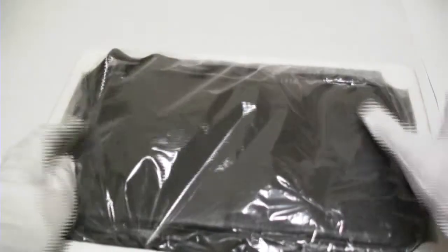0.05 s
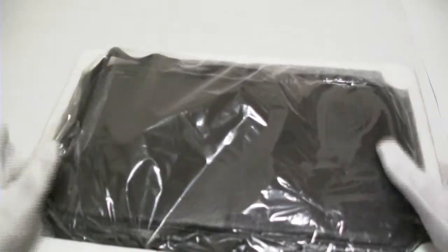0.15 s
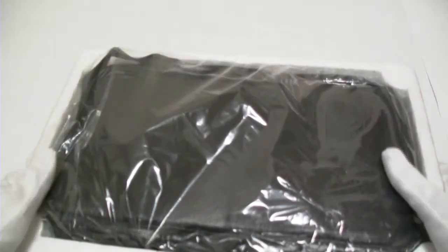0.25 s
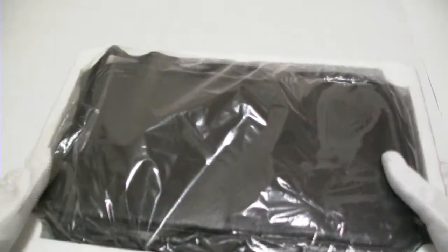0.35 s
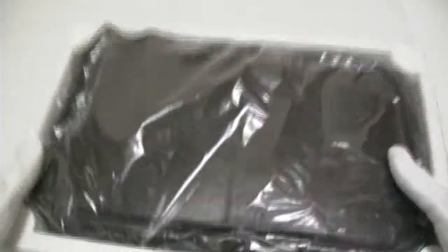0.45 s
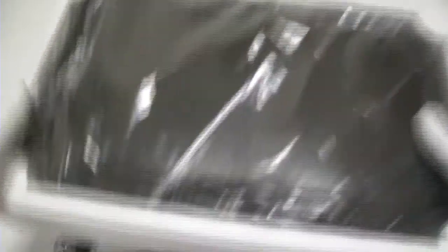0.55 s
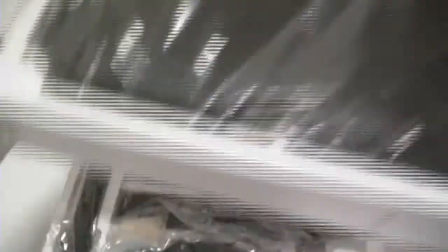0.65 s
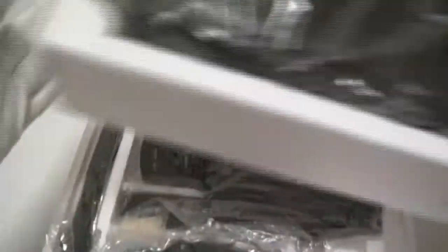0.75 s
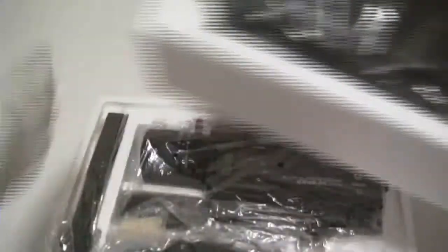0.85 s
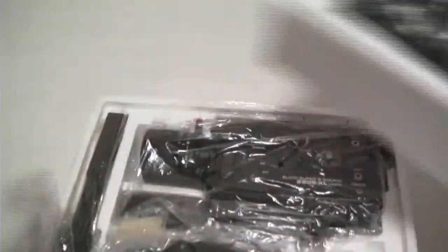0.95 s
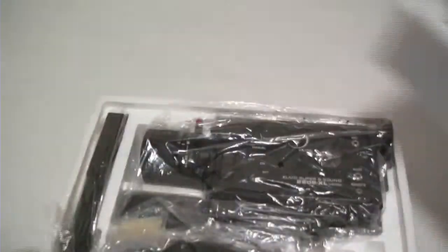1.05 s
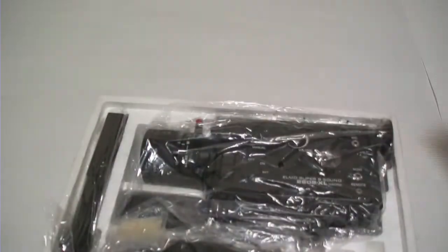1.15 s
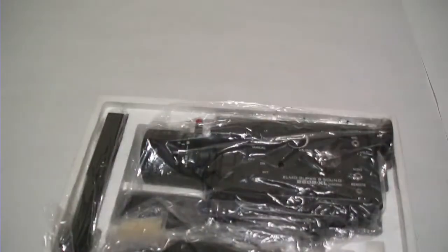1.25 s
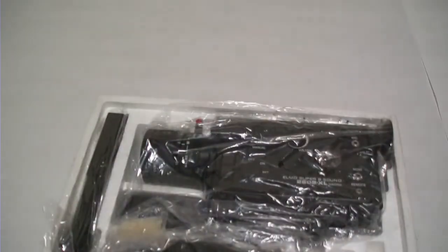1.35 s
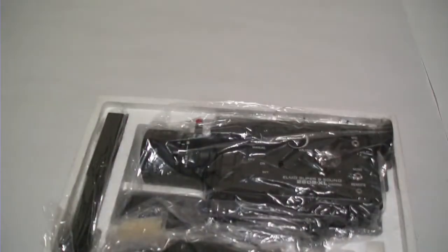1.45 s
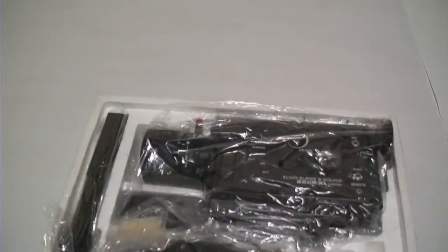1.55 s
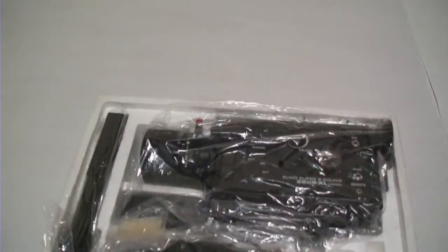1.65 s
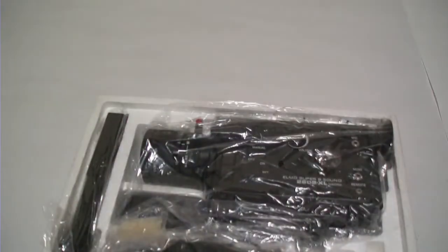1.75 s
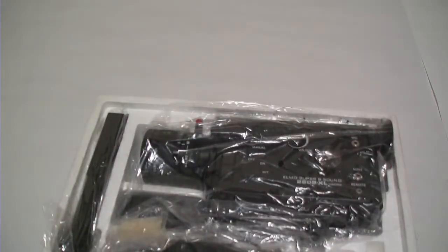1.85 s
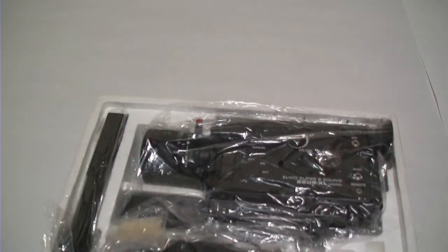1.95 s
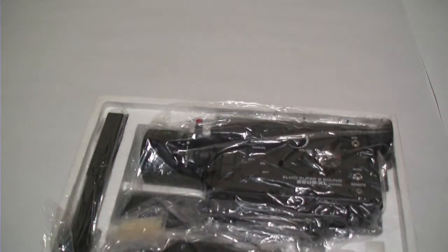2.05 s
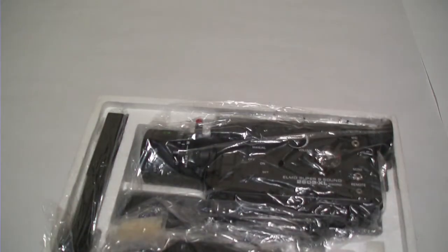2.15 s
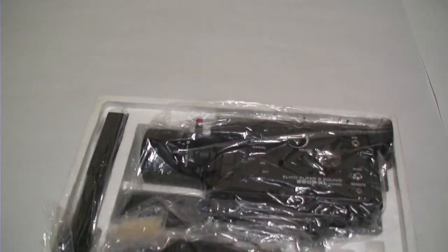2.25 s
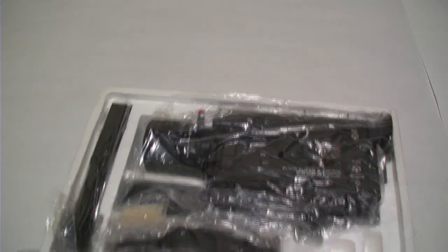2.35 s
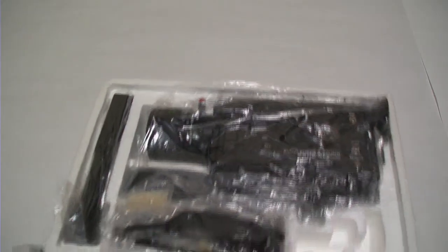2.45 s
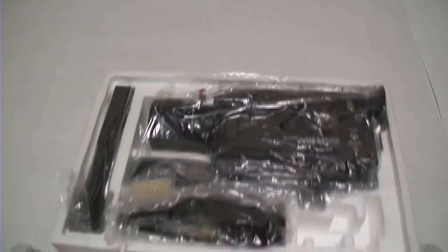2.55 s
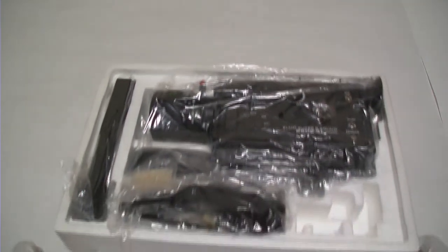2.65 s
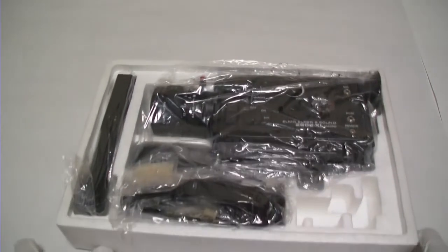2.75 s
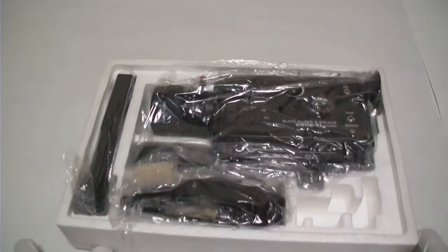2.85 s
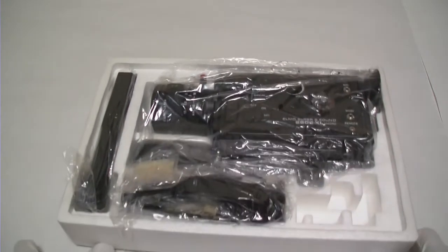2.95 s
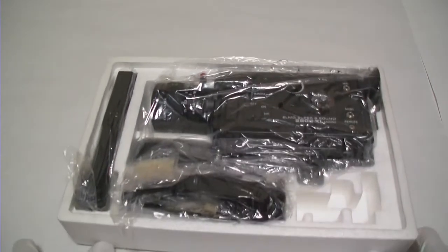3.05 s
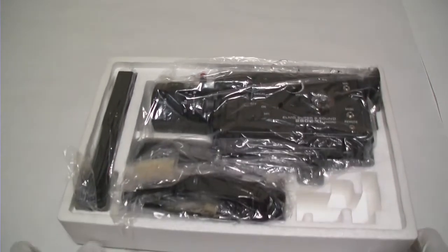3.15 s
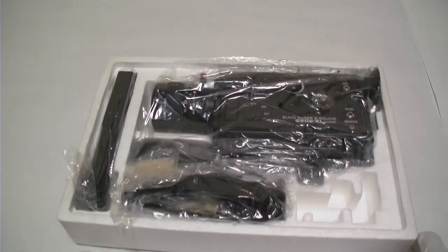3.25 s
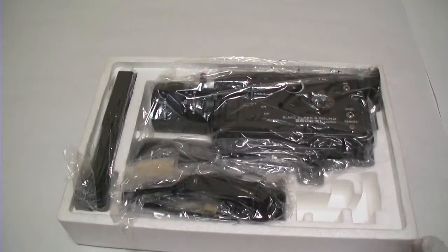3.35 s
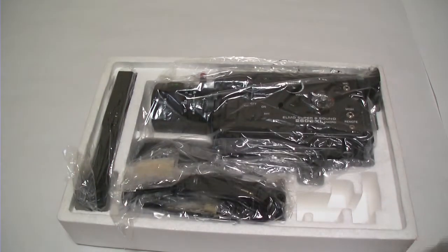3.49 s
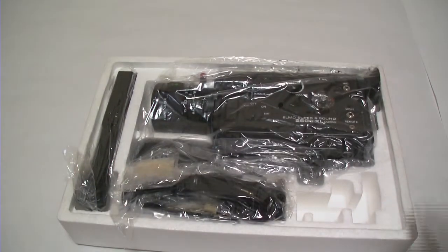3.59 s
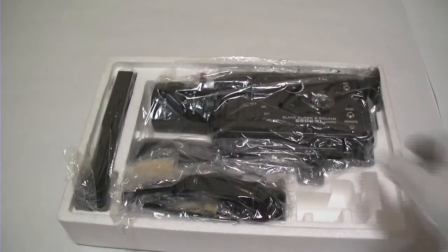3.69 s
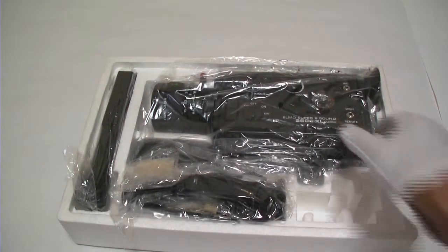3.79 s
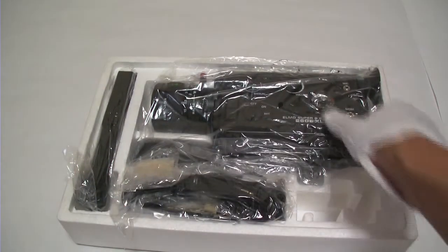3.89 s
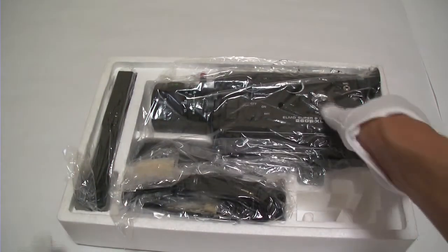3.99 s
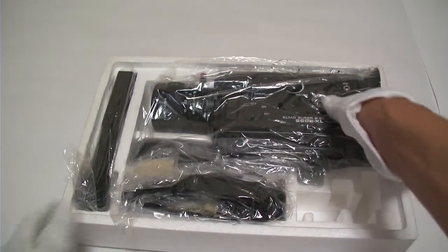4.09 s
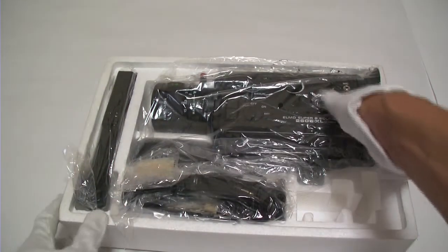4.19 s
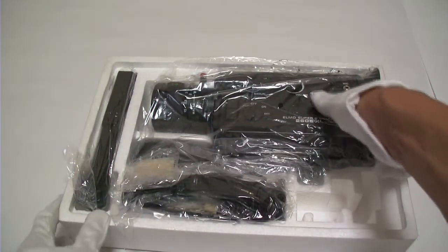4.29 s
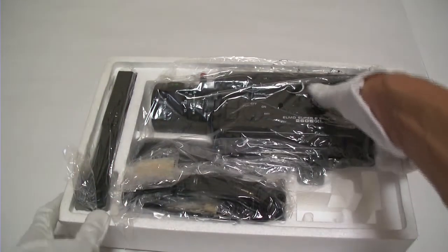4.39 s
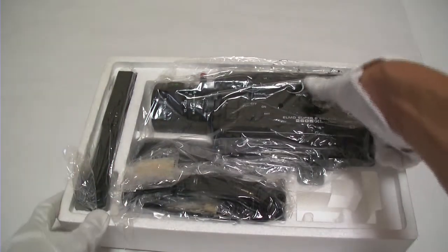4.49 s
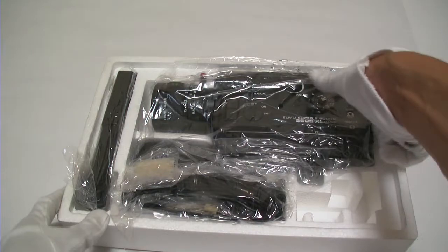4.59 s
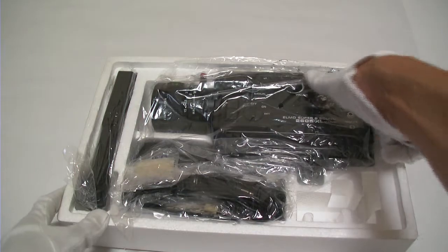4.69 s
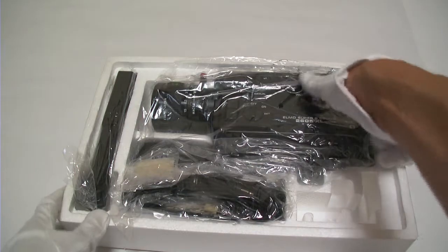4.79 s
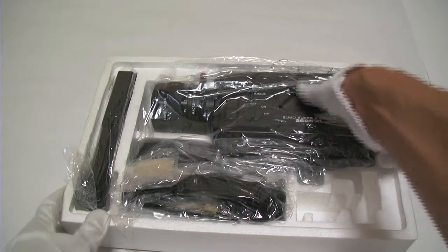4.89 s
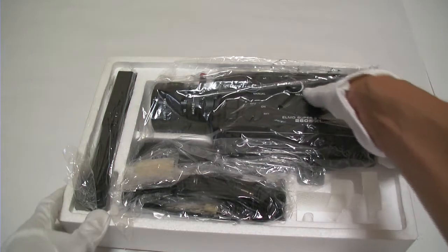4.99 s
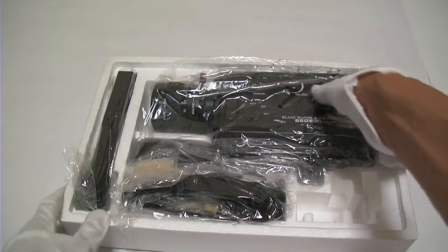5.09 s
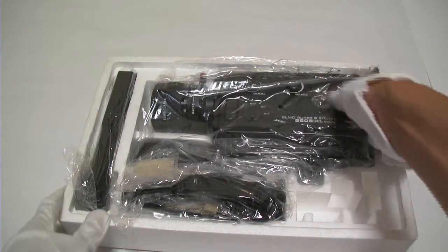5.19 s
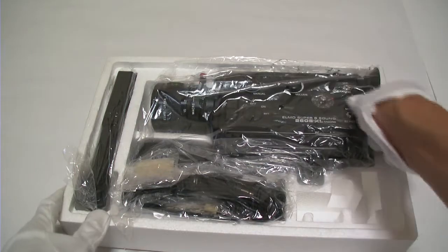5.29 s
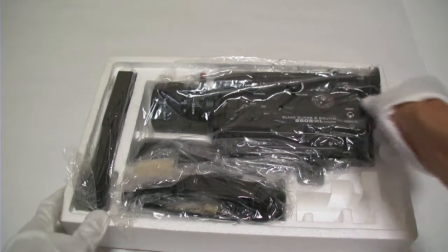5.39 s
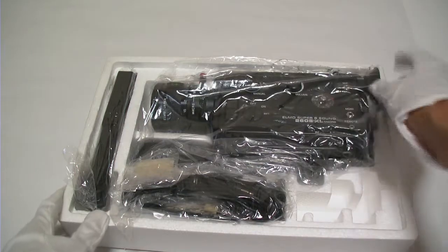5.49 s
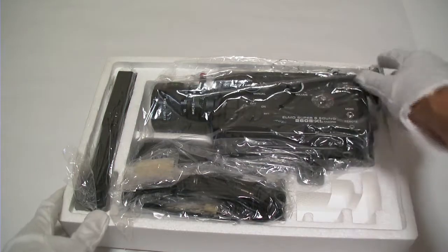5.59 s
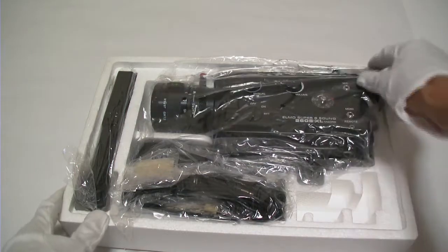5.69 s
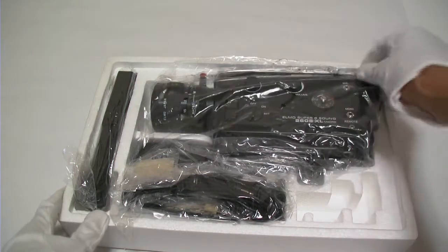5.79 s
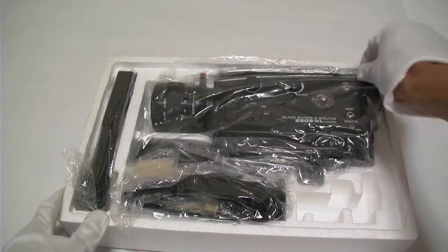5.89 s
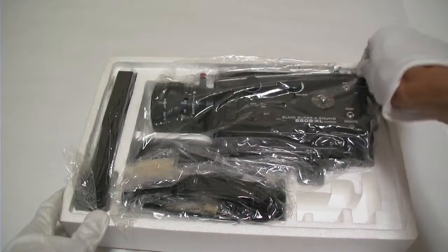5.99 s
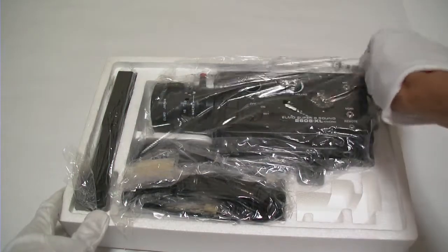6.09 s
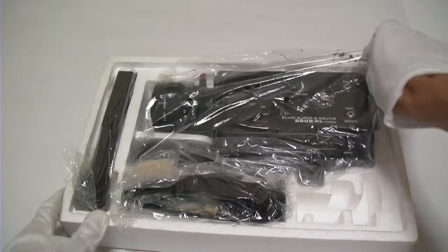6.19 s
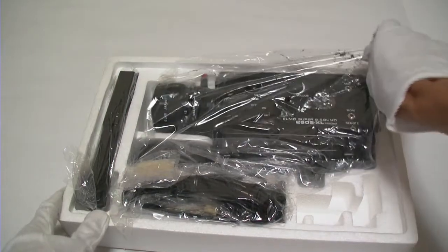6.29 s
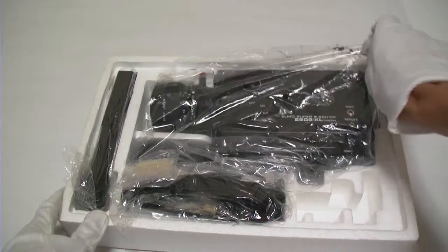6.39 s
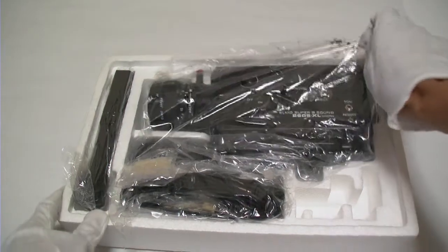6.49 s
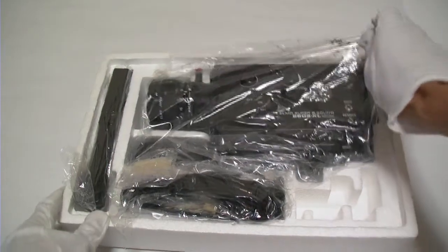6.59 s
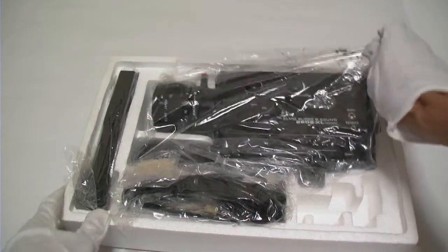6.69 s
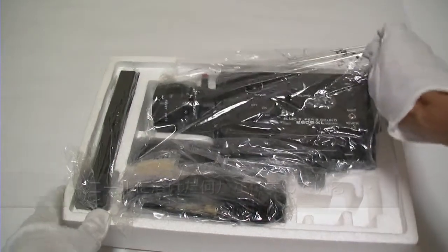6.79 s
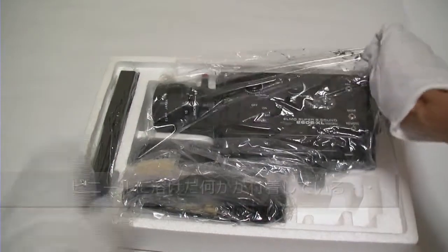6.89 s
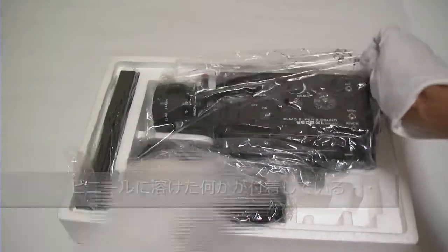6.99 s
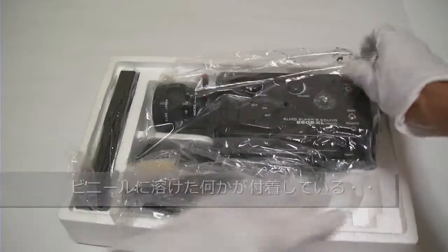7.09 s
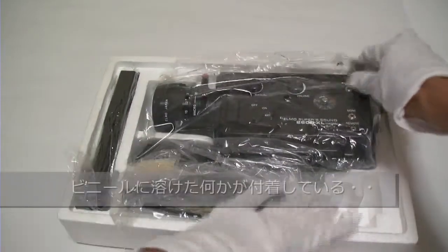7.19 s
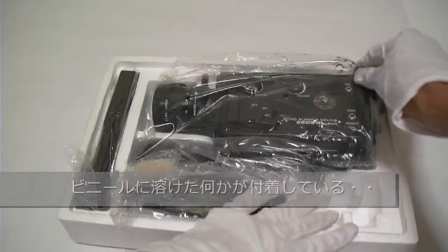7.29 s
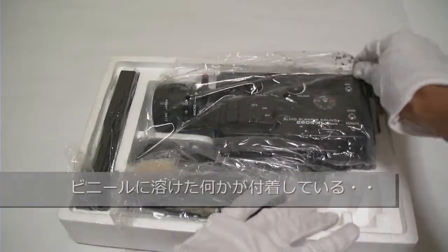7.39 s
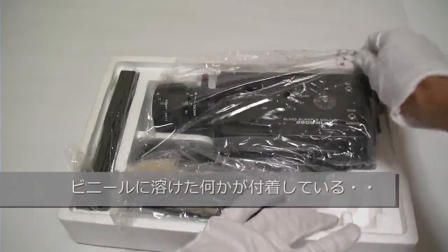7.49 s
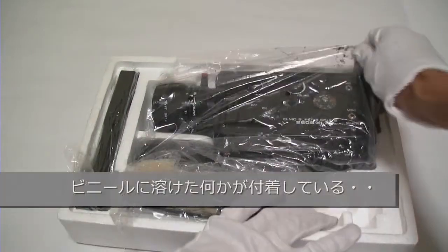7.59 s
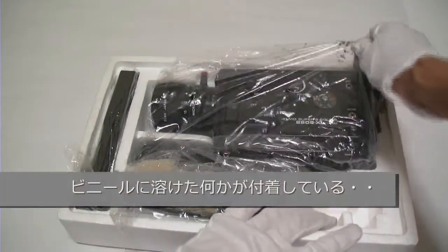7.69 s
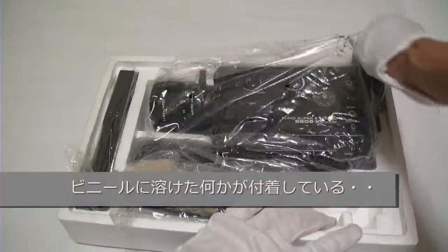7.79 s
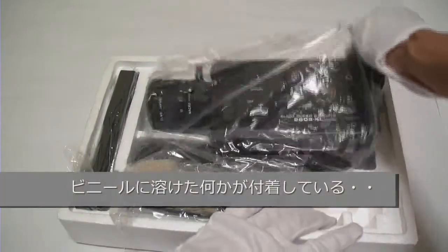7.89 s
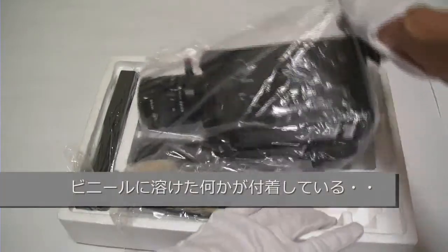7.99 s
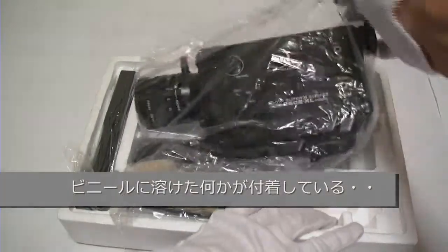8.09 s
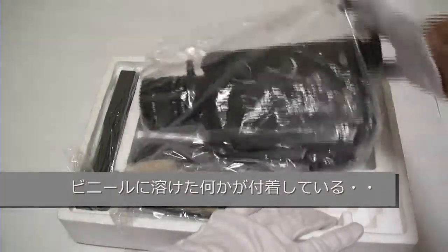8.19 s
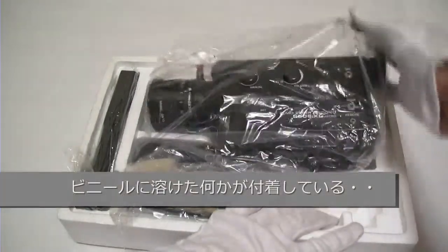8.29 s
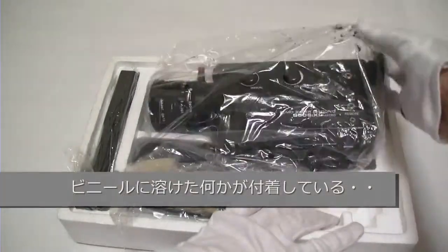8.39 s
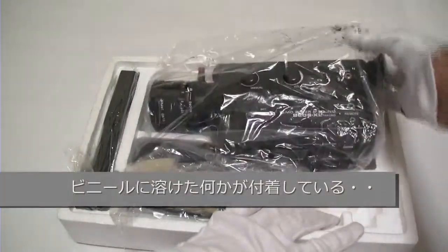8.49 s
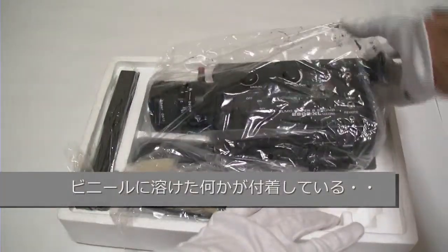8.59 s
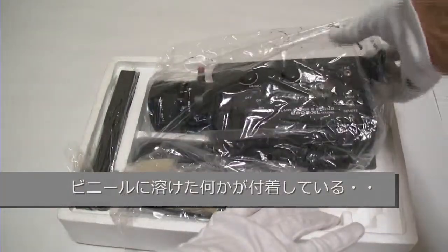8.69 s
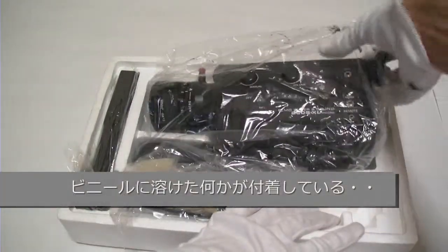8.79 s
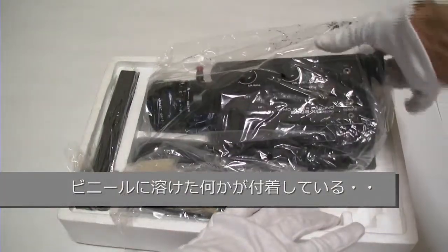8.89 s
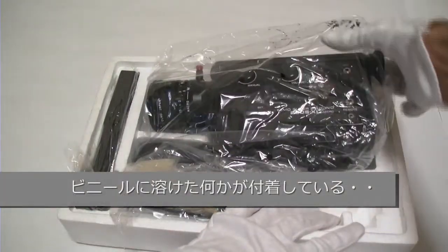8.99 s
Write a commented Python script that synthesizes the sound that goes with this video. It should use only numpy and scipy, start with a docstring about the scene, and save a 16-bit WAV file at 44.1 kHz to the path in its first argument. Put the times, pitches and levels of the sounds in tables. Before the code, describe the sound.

Close crisp crinkling of clear film, preceded by hollow foam knocks and a short sliding hiss, in a quiet room with soft steady hum.

```python
"""Foam lid, tray and crackling film

Gloved hands lift a foam lid off a tray, set it down, slide the tray, then tug at clear film around its contents.
Film: noise clicks through wide resonances; rubs and slides: coloured patchy noise; blows: bursts into modes.
A sliding tone sings and sinks, motor sines hum over room air; two close ports hear nearly the same."""
import sys
import numpy as np
from scipy import signal
from scipy.fft import rfft, irfft, next_fast_len
from scipy.io import wavfile
from scipy.ndimage import uniform_filter1d, map_coordinates

SR = 44100
rng = np.random.default_rng(int(sys.argv[2]) if len(sys.argv) > 2 else 0)


def master(y):
    """Save y as 16-bit WAV."""
    cut = np.clip(np.atleast_2d(y).T, -1, 1)
    pcm = np.round(cut * 32767)  # scale
    wavfile.write(sys.argv[1], SR, pcm.astype(np.int16))


def invert_db(x):
    """Field ratio 10**(x/20) for x, a level in decibels (scalar or array-like)."""
    u = np.asarray(x, float) / 20
    return 10 ** u


N = 399105


def unit(x):
    """Scale to rms 1."""
    return x / np.sqrt(np.mean(x ** 2) + 1e-20)


def along(points, hz):
    """(f/Hz, value) points interpolated on a log frequency axis."""
    f, v = np.transpose(points)
    return np.interp(np.log(hz + 1), np.log(f + 1), v)


def curves(rows):
    """One value per sample for each column after the time."""
    s, *cols = np.transpose(rows)
    return [np.interp(np.arange(N) / SR, s, c) for c in cols]


def wobble(rate_hz):
    """Smooth random curve with rate_hz knots a second."""
    knots = rng.standard_normal(int(N * rate_hz / SR) + 4)
    return map_coordinates(knots, [np.arange(N) * rate_hz / SR])


def filtered(x, response):
    """x times a complex response of frequency."""
    m = next_fast_len(N + SR // 2)
    return irfft(rfft(x, m) * response(np.fft.rfftfreq(m, 1 / SR)), m)[..., :N]


def coloured(x, spectrum):
    """x with the colour of a (f/Hz, level/dB) table, at rms 1."""
    return unit(filtered(x, lambda hz: invert_db(along(spectrum, hz))))


def patchy(patchy_db):
    """White noise with patches of random gain in time and frequency."""
    z = signal.stft(rng.standard_normal(N), nperseg=256)[2]
    field = rng.standard_normal(z.shape)
    field = uniform_filter1d(uniform_filter1d(field, 4, 0), 14, 1)
    return signal.istft(z * invert_db(patchy_db * unit(field)), nperseg=256)[1][:N]


def placed(s, rows):
    """Rows of samples added in at their start times."""
    at = np.round(s * SR).astype(int)[:, None] + np.arange(rows.shape[1])
    return np.bincount(at.ravel(), rows.ravel(), N + SR)[:N]


def buckles(s, hz, t60, sharp, size=384):
    """Clicks of peak 1: a faint creak, a spike and a dying noise burst, through one wide resonance each."""
    lead_s = 0.0004  # creak before the buckle lets go
    t = np.arange(size) / SR - lead_s
    decay_s = np.where(t < 0, 0.002, np.maximum(t60, 1e-3)[:, None])
    burst = rng.standard_normal((len(s), size)) * invert_db(-60 * np.abs(t) / decay_s)
    burst[:, round(lead_s * SR)] = 3 * np.sign(burst[:, 0])
    f, c = np.fft.rfftfreq(2 * size, 1 / SR), hz[:, None]
    damping = 1j * f * c / sharp
    ring = damping / (c * c - f * f + damping)
    # the film is too limp to carry much far above its ring
    ring = ring / (1 + 1j * f / (3.4 * c))
    clicks = irfft(rfft(burst, 2 * size) * ring, 2 * size)[:, :size]
    return clicks / np.abs(clicks).max(1, keepdims=True)


def crackle(count=4500):
    """Countless small film buckles: random times, pitches and lengths, a few larger than the rest."""
    draw = rng.random((count, 2))
    spread = rng.standard_normal((count, 2))
    size_db = np.minimum(-5.2 * np.log(1 - draw[:, 1]), 14)
    hz = np.clip(7000 * np.exp(0.64 * spread[:, 0]), 2800, 15000)
    t60 = 0.004 * np.exp(0.5 * spread[:, 1])
    rows = buckles(draw[:, 0] * N / SR, hz, t60, sharp=2.2, size=256)
    return unit(placed(draw[:, 0] * N / SR, rows * invert_db(size_db)[:, None]))


def strokes(rows, stop=1, halt=1):
    """Stroke power over time: plain, foam body, top edge; stop scales the fall, halt its first drop."""
    rise_db_per_s, fall_db_per_s, hold_gain_db_per_s = 553, 278, 0.5
    tail_db = -8.5  # where the slower tail starts
    body_per_bright = -0.74  # a brighter stroke stirs the foam body less
    s, hold, db, bright_db = np.transpose(rows)[..., None]
    t = np.arange(0, N, 32) / SR
    fall_db = -stop * fall_db_per_s * np.maximum(t - s - hold, 0)
    release_db = np.maximum(halt * fall_db, tail_db + fall_db / 2)
    swell_db = -rise_db_per_s * np.maximum(s - t, 0)
    held_db = hold_gain_db_per_s * np.clip(t - s, 0, hold)
    effort_db = db + held_db + swell_db + release_db
    powers = [(invert_db(effort_db + lean * bright_db) ** 2).sum(0) for lean in (0, body_per_bright, 1)]
    return np.array([np.interp(np.arange(N) / SR, t, p) for p in powers])


def film_gives():
    """Power of sudden gives under a pressing finger: quick swell, exponential decay; plain, body, top."""
    # finger presses the film down: t/s, level/dB, t60/s
    presses = [(4.29, -24, 0.15), (4.333, -34, 0.18)]
    swell_s, body_db, top_db = 0.0064, -6.5, -0.5
    t = np.arange(N) / SR
    level = 0
    for s, db, t60 in presses:
        fade_db = db - 60 * np.maximum(t - s - swell_s, 0) / t60
        level = level + np.clip((t - s) / swell_s, 0, 1) * invert_db(fade_db)
    return level ** 2 * invert_db([[0], [body_db], [top_db]]) ** 2


def handling():
    """Smooth rubbing and crackle stir the film and its top edge; mostly rubbing stirs the foam body."""
    # gloves and foam rub: full effort t/s, hold/s, level/dB, brightness/dB
    rub_rows = [(0.262, 0.09, -45, 9), (0.453, 0.019, -44, 3), (0.39, 0.13, -51.5, 5),
                (0.552, 0.022, -44, 9), (0.606, 0.022, -36, 3), (0.665, 0.043, -37.5, 7),
                (0.729, 0.11, -35.5, 7.5), (0.835, 0.054, -47, 3), (0.99, 0.14, -54, 6.5),
                (1.182, 0.057, -47.5, 7), (1.532, 0.017, -35.5, 11.5), (1.621, 0.012, -47, -8),
                (1.668, 0.033, -39.5, 2), (1.762, 0.044, -40, 2), (1.824, 0.012, -39.5, -1),
                (1.99, 0.034, -49, 6.5), (2.236, 0.042, -43.5, 9), (2.351, 0.02, -44, 6),
                (3.241, 0.024, -48, -6), (3.878, 0.079, -41.5, 5), (3.995, 0.045, -42, 5.5),
                (4.062, 0.099, -45, 3), (4.208, 0.12, -45.5, 2), (4.402, 0.043, -45.5, 1),
                (4.531, 0.048, -39, 3), (4.591, 0.16, -47.5, -2.5), (5.405, 0.12, -44, 5),
                (5.615, 0.019, -40.5, 6.5)]
    # fingers tug at the film: full effort t/s, hold/s, level/dB, brightness/dB
    tug_rows = [(0.003, 0.08, -46, 0.5), (0.13, 0.055, -61, 13), (0.2, 0.023, -40.5, -5),
                (5.019, 0.044, -54, 4.5), (5.262, 0.15, -56, 4), (5.692, 0.22, -56.5, 2),
                (5.795, 0.0053, -38, 0), (5.897, 0.031, -38.5, -1), (6.03, 0.033, -62, 1),
                (6.137, 0.16, -43.5, -0.5), (6.297, 0.034, -38.5, 2), (6.372, 0.3, -54, -5.5),
                (6.772, 0.057, -48, -0.5), (6.927, 0.01, -46, 1), (6.997, 0.22, -51, -2),
                (7.298, 0.072, -46, 0.5), (7.4, 0.14, -44.5, -1), (7.572, 0.035, -39, -1.5),
                (7.699, 0.12, -45, -1), (7.825, 0.059, -38.5, -0.5), (7.927, 0.075, -40, 0),
                (8.023, 0.079, -37, -2), (8.153, 0.044, -39, 0), (8.301, 0.23, -40.5, -1),
                (8.603, 0.18, -43.5, -1), (8.737, 0.17, -44, -0.5), (8.89, 0.14, -48.5, -6)]
    # faint film noise under the strokes, with a sudden near-silent gap around 3.7 s: t/s, level/dB
    faint_film_rows = [(0, -58), (2.1, -63.5), (3.4, -63.5), (3.6, -62.5), (3.7, -74), (3.86, -69),
                       (4.9, -58.5), (9.05, -89)]
    # stroke kinds: crackle share 0-1, foam body/dB, top edge/dB
    rub_kind = (0.081, -8, -7)
    tug_kind = (0.62, -6, -3)
    # film colour before rms scaling: f/Hz, level/dB
    film_colour = [(1200, -81), (2000, -12.5), (3100, -11.5), (4200, -4), (5500, -2), (7500, -5.5),
                   (9000, -11), (10500, -15.5), (12000, -40)]
    # foam body colour before rms scaling: f/Hz, level/dB
    body_colour = [(150, -36), (600, -7.5), (900, 0), (1300, -0.5), (1620, 2), (2000, 1), (2500, -9),
                   (3600, -8.5), (5000, -48)]
    # film top edge colour before rms scaling: f/Hz, level/dB
    top_colour = [(6000, -62), (7500, -25.5), (9000, -17.5), (11500, -13), (16000, -18.5)]

    rubs = strokes(rub_rows, halt=9.5) + film_gives()
    jerks = invert_db(1.2 * wobble(30))  # a pull on the film is never even
    tugs = strokes(tug_rows, stop=0.5, halt=1.6) * jerks ** 2
    tugs = tugs + invert_db(curves(faint_film_rows)[0]) ** 2
    kinds = [(rub_kind, rubs), (tug_kind, tugs)]
    total = sum(power[0] for kind, power in kinds)
    share = np.clip(sum(kind[0] * power[0] for kind, power in kinds) / total, 0, 1)
    body = np.sqrt(sum(invert_db(kind[1]) ** 2 * power[1] for kind, power in kinds))
    top = np.sqrt(sum(invert_db(kind[2]) ** 2 * power[2] for kind, power in kinds))

    # crackle comes in clumps of a few hundredths of a second
    clumps = unit(invert_db(1.5 * wobble(40)) * crackle())
    smooth = unit(patchy(patchy_db=3.0))
    stir = np.sqrt(1 - share) * smooth + np.sqrt(share) * clumps
    body_stir = smooth + 0.71 * np.sqrt(share) * clumps
    film_sound = np.sqrt(total) * coloured(stir, film_colour)
    body_sound = body * coloured(body_stir, body_colour)
    return film_sound + body_sound + top * coloured(stir, top_colour)


def snaps():
    """Loud single film buckles; the lower ones last longer, and each leaves a grainy rattle in the crease."""
    # single buckles: start t/s, peak before rattle and hollow/dB, centre f/Hz
    snap_rows = [(0.0406, -19, 6800.0), (0.0555, -22, 8800.0), (0.1211, -26, 5700.0), (0.2053, -20, 7000.0),
                 (0.2251, -19.5, 7900.0), (0.24, -17, 8500.0), (0.2701, -19, 7400.0), (0.3389, -21, 6800.0),
                 (0.5597, -20, 2800.0), (0.5765, -22, 7000.0), (0.5865, -22, 7000.0), (0.6135, -20, 5600.0),
                 (0.8846, -17, 7400.0), (2.1395, -21, 5900.0), (2.9695, -32, 7500.0), (2.993, -30, 6000.0),
                 (3.193, -32, 8000.0), (4.058, -20, 7100.0), (4.0665, -22, 6500.0), (4.142, -25, 7000.0),
                 (4.2393, -22, 7400.0), (4.3052, -12, 5000.0), (4.4433, -25, 6900.0), (4.8949, -24, 8500.0),
                 (5.0525, -27, 8900.0), (5.1169, -29, 8300.0), (5.4266, -21, 8200.0), (5.4763, -19, 7900.0),
                 (5.4954, -20, 9000.0), (5.5189, -25, 8200.0), (5.7818, -18, 9500.0), (5.8259, -20, 9200.0),
                 (6.108, -27, 6200.0), (6.1425, -22, 5600.0), (6.1571, -21, 6100.0), (6.1869, -23, 4900.0),
                 (6.201, -16, 8700.0), (6.2244, -20, 6800.0), (6.26, -16, 7900.0), (6.2764, -18, 6400.0),
                 (6.4417, -20, 4300.0), (6.4708, -30, 3800.0), (6.5256, -28, 3000.0), (6.577, -30, 5400.0),
                 (6.591, -31, 9000.0), (6.6287, -27, 7100.0), (6.663, -27, 6700.0), (6.699, -30, 5500.0),
                 (7.0698, -21, 6500.0), (7.0983, -19, 4500.0), (7.1428, -21, 6400.0), (7.1807, -20, 5700.0),
                 (7.2713, -29, 6300.0), (7.2861, -26, 7300.0), (7.3089, -21, 6700.0), (7.3239, -21, 5800.0),
                 (7.3618, -22, 7100.0), (7.4675, -21, 5600.0), (7.5403, -23, 4700.0), (7.5573, -14, 7900.0),
                 (7.5686, -15, 5000.0), (7.5802, -20, 6500.0), (7.5826, -16, 5000.0), (7.5965, -22, 8000.0),
                 (7.6212, -18, 5300.0), (7.636, -15, 4200.0), (7.6696, -23, 3300.0), (7.761, -23, 6700.0),
                 (7.8222, -23, 5500.0), (7.8307, -17, 6800.0), (7.8505, -18, 4500.0), (7.9924, -21, 7200.0),
                 (8.0223, -14, 5200.0), (8.0304, -22, 5300.0), (8.1226, -17.5, 6400.0),
                 (8.1537, -11, 5000.0), (8.1575, -21, 4600.0), (8.3096, -17, 6800.0), (8.3875, -21, 4800.0),
                 (8.4638, -18, 6600.0), (8.5046, -15, 7800.0), (8.5176, -21, 5200.0), (8.5881, -25, 5400.0),
                 (8.648, -18, 5400.0), (8.6639, -18, 8900.0), (8.691, -21, 8900.0), (8.7128, -24, 5300.0),
                 (8.7583, -20, 5200.0), (8.8179, -20, 7000.0), (8.8524, -10.5, 5000.0),
                 (8.8917, -16, 5400.0), (8.9114, -24, 5300.0), (8.9559, -24, 5000.0), (9.0062, -22, 4500.0),
                 (9.008, -17, 4300.0)]
    rattle_db, rattle_t60_s = -15.5, 0.033  # peak before the grain, under the snap
    hollow_depth, hollow_hz, hollow_width_hz = 0.79, 2900, 320  # snaps sound weak in this band
    s, db, hz = np.transpose(snap_rows)
    rows = buckles(s, hz, 32 / hz, sharp=1.36, size=1024)
    grain_db = 5 * np.sqrt(24) * uniform_filter1d(rng.standard_normal(rows.shape), 24, 1)
    rattle = buckles(s, hz, rattle_t60_s + 0 * s, sharp=1.2, size=1024) * invert_db(grain_db)
    rows = rows + invert_db(rattle_db) * rattle
    clicks = placed(s, rows * invert_db(db)[:, None])
    return filtered(clicks, lambda f: 1 - hollow_depth * np.exp(-((f - hollow_hz) / hollow_width_hz) ** 2))


def blows():
    """Knocks and thumps: a short burst into low modes and, by its hardness, into upper ones."""
    # foam lid and tray knock first, from 5.92 s thumps of the film:
    # t/s, blow strength/dB, hardness/dB, t60/s, struck spot f/Hz
    blow_rows = [(0.341, -24, 1.5, 0.036, 750), (0.35, -28, -16, 0.34, 726),
                 (1.512, -16.5, -12, 0.065, 610), (1.526, -23, -16, 0.25, 525),
                 (1.8186, -24.5, -1.5, 0.26, 430), (5.92, -38.5, 9, 0.085, 800),
                 (7.335, -41.5, 13.5, 0.072, 800), (7.568, -34, 11.5, 0.038, 800),
                 (7.851, -35.5, 10, 0.096, 800), (8.75, -30, -2, 0.041, 850), (8.853, -30, 7, 0.029, 800),
                 (8.948, -40, 13.5, 0.053, 800)]
    # resonances: f/Hz, width/Hz, gain before spot or hardness/dB
    modes = [(234, 68, 13), (420, 85, 0), (539, 24, 3), (696, 140, -4.5), (856, 68, -3), (1470, 1470, 3.5),
             (2220, 6100, -18.5)]
    push_s, spot_db_per_octave = 0.0007, 16.5
    s, db, hard_db, t60, spot_hz = np.transpose(blow_rows)[..., None]
    t = np.arange(SR // 4) / SR
    f = np.fft.rfftfreq(len(t), 1 / SR)
    rattle = rng.standard_normal((len(s), len(t)))
    # first contact is one sine cycle, the rest a dying rattle
    push = np.sin(2 * np.pi * np.minimum(t / push_s, 1))
    fade = invert_db(db - 60 * t / t60)

    def mode(k, c, w, gain_db):
        """Resonance at c Hz, w Hz wide; signs alternate within the low modes and within the upper modes."""
        return (-1) ** k * invert_db(gain_db) * 1j * f * w / (c * c - f * f + 1j * f * w)

    low = high = 0
    for k, (c, w, gain_db) in enumerate(modes[:-2]):
        # modes near the struck spot's own pitch are favoured
        low = low + mode(k, c, w, gain_db - spot_db_per_octave * np.abs(np.log2(c / spot_hz)))
    for k, (c, w, gain_db) in enumerate(modes[-2:]):
        high = high + mode(k, c, w, gain_db + hard_db)
    low_drive = rfft((rattle + 6 * push) * fade)
    high_drive = rfft((rattle + 0.64 * push) * fade)
    return placed(s[:, 0], irfft(low_drive * low + high_drive * high, len(t)))


def slide():
    """Dense, even friction of sliding foam: nearly steady noise in fixed bands."""
    # lid off the tray, then tray over the table: full effort t/s, hold/s, level/dB
    slide_rows = [(0.768, 0.043, -36), (0.799, 0.025, -33.5), (2.411, 0.04, -32), (2.45, 0.25, -30.5),
                  (2.718, 0.11, -32.5), (2.83, 0.058, -36), (3.023, 0.13, -38.5)]
    # sliding hiss colour before rms scaling: f/Hz, level/dB
    hiss_colour = [(150, -60), (450, -28), (850, -11), (1630, -1), (2950, -10), (5400, -1), (7200, -7),
                   (8800, -4), (15700, -9)]
    power = strokes([(s, hold, db, 0) for s, hold, db in slide_rows], halt=1.9)[0]
    return np.sqrt(power) * coloured(patchy(patchy_db=1.0), hiss_colour)


def scrape():
    """A narrow, rough tone that sinks as the tray slides and slows."""
    # singing tray, before roughness: t/s, f/Hz, peak level/dB
    song = [(2.42, 998, -82), (2.48, 966, -53), (2.6, 933, -39), (2.8, 850, -82)]
    hz, db = curves(song)
    phase = 2 * np.pi * np.cumsum(hz * (1 + 0.0203 * wobble(60))) / SR
    return invert_db(db + 0.81 * wobble(45)) * np.sin(phase)


def room(x):
    """Reverberation: each frequency of a noise tail dies at its own speed."""
    # room decay: f/Hz, t60/s
    decay = [(300, 1), (2000, 0.57), (10000, 0.054)]
    hz, t, z = signal.stft(rng.standard_normal(SR // 2), SR, nperseg=256)
    fade = invert_db(-60 * t / along(decay, hz)[:, None])
    tail = signal.istft(z * fade, SR, nperseg=256)[1]
    delayed = np.pad(x, (60, 0))  # samples
    return signal.fftconvolve(delayed, tail / np.linalg.norm(tail))[:N]


def motor():
    """Slightly unsteady sines at multiples of the motor speed, plus a separate tone."""
    # motor tones before wobble and shade: multiple of the speed, rms level/dB
    orders = [(1, -67), (3, -60), (4, -55), (5, -64), (7, -66.5)]
    # raised lid shades the fourth multiple: t/s, gain/dB
    lid_shade = [(1.5, -4), (2.8, 0)]
    # separate tone before wobble: f/Hz, rms level/dB
    second_tone = (286.9, -63)
    motor_hz = 231.85
    turns = 2 * np.pi * np.cumsum(motor_hz * (1 + 0.0008 * wobble(3))) / SR
    tones = 0
    for k, db in orders:
        level_db = db + 2 * wobble(6) + (k == 4) * curves(lid_shade)[0]
        tones = tones + invert_db(level_db) * np.sin(k * turns + 6 * rng.random())
    hz, db = second_tone
    phase = 2 * np.pi * np.cumsum(hz * (1 + 0.0029 * wobble(7.5))) / SR
    tones = tones + invert_db(db + 0.51 * wobble(2.84)) * np.sin(phase)
    return np.sqrt(2) * tones  # rms to peak


def room_air():
    """Moving air of the room: coloured, faintly patchy noise with a slow sway."""
    # air colour before rms scaling: f/Hz, level/dB
    air_colour = [(40, -39), (115, -17.5), (200, -11), (350, -6.5), (520, -3), (800, -0.5), (1080, -2),
                  (1250, -4.5), (1550, -1.5), (1800, -6), (2200, -8), (2700, -13), (6000, -21), (9000, -32),
                  (16000, -30)]
    level_db = -50 + 1.0 * wobble(2.566)
    return invert_db(level_db) * coloured(patchy(patchy_db=1.47), air_colour)


def ports(mid):
    """Two microphone ports differ by a weak copy with ever-changing phases."""
    # port difference: f/Hz, side relative to mid/dB
    apart = [(30, -28), (250, -36), (700, -19), (1500, -30), (10000, -23), (12500, -13.5), (15000, -8.5)]
    z = signal.stft(mid, nperseg=256)[2]
    turned = z * np.exp(2j * np.pi * rng.random(z.shape))
    scattered = signal.istft(turned, nperseg=256)[1][:N]
    side = filtered(scattered, lambda hz: invert_db(along(apart, hz)))
    return np.array([mid + side, mid - side])


def scene():
    """Close sources with a little room, over motor and air, at both ports."""
    near = handling() + slide() + snaps() + blows() + scrape()
    return ports(near + invert_db(-14) * room(near) + motor() + room_air())


def top_cut(x):
    """Nothing passes above the cut-off."""
    return signal.sosfilt(signal.butter(12, 16970, fs=SR, output="sos"), x)


def record(dry):
    """The microphone drops the deep bass below 90 Hz; a sharp band limit cuts the top."""
    top_hz, bass_cut_hz = 15760, 90
    mix = filtered(dry, lambda hz: (hz < top_hz) * 1j * hz / (bass_cut_hz + 1j * hz))
    return top_cut(mix)


dry = scene()
out = record(dry)
master(out)
```